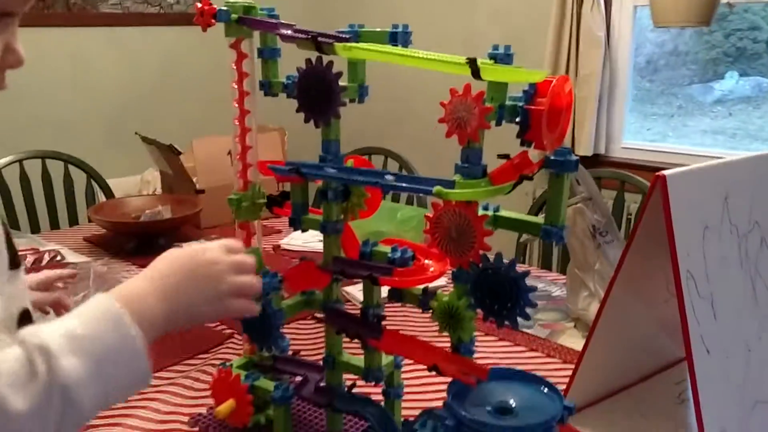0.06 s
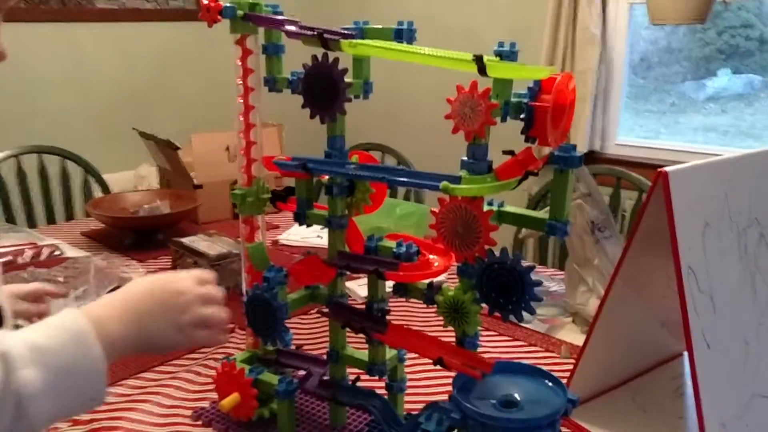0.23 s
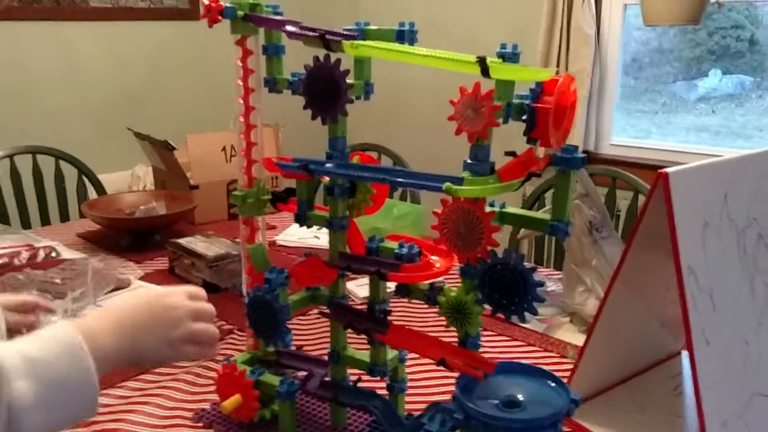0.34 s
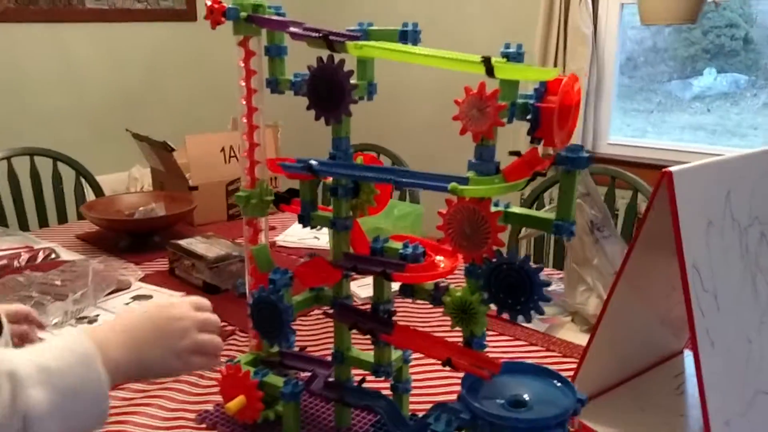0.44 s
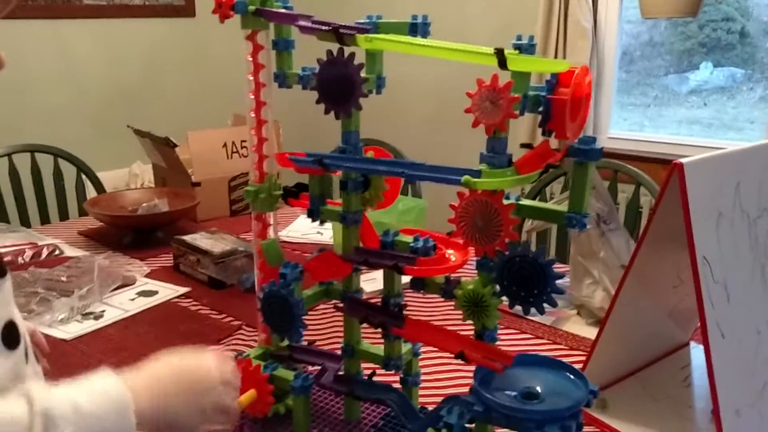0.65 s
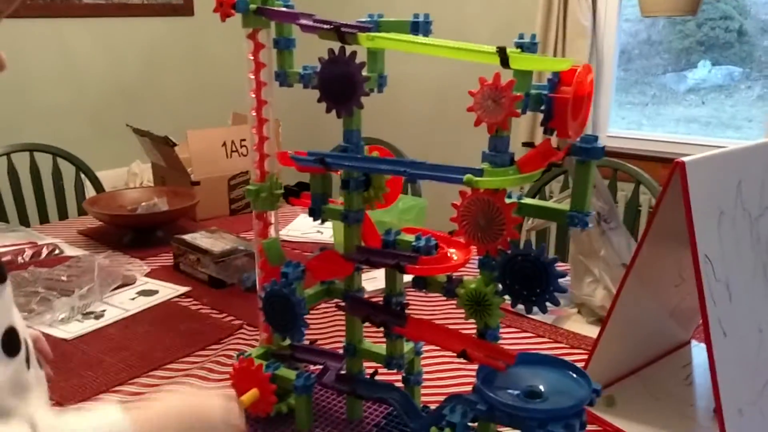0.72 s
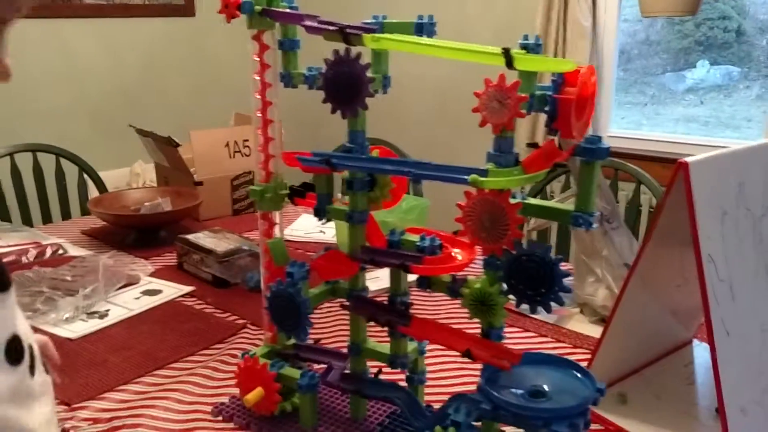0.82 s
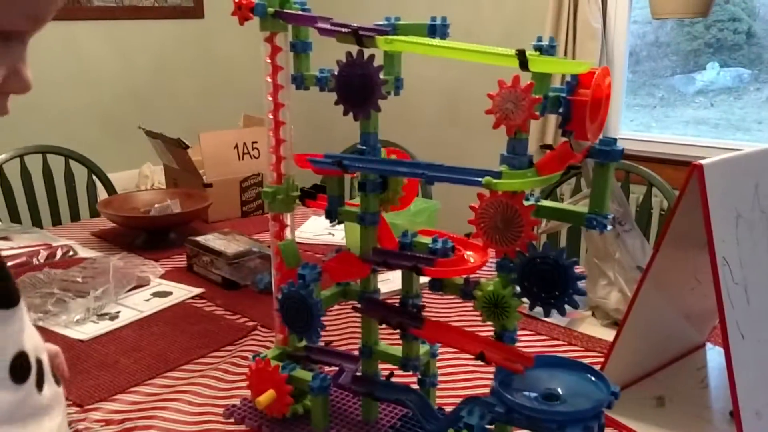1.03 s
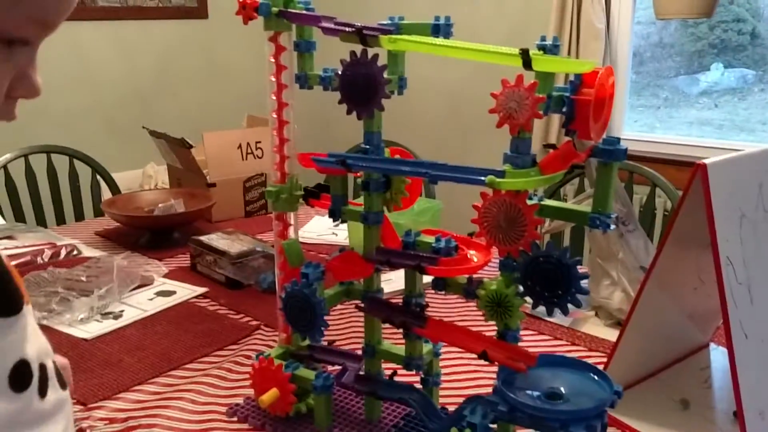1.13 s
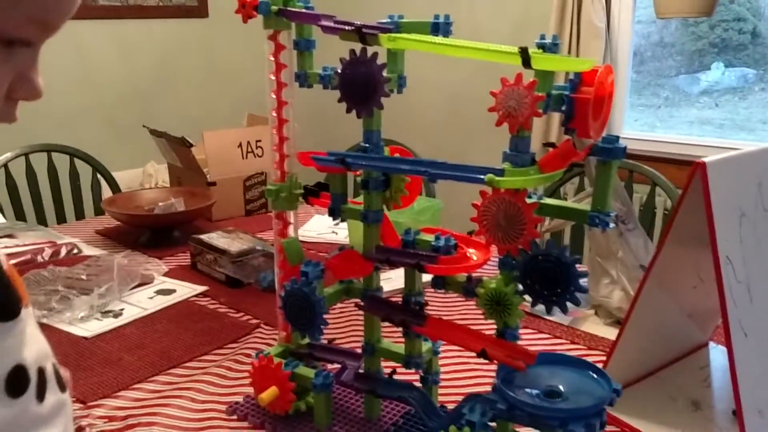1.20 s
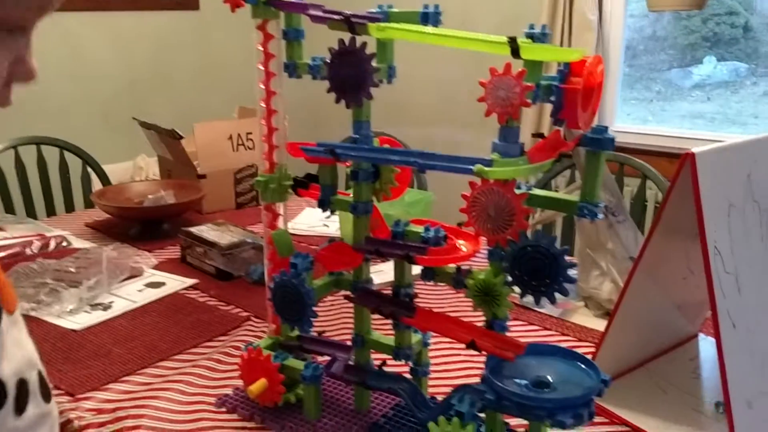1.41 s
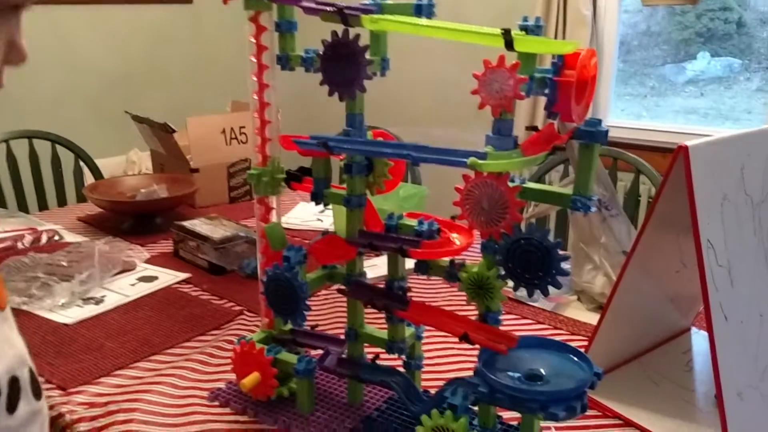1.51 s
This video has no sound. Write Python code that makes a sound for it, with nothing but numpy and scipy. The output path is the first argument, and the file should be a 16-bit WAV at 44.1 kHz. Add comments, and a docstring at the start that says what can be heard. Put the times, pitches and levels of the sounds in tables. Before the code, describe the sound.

Marbles knock, tap and click through a plastic toy track in a quiet room.

```python
"""Marbles work their way down a plastic marble run in a quiet dining room, heard from close by.
They rattle along, thud twice on the frame, tap on a track, click on levers and clack into chutes.
One pings on a thin part and skids, and one rolls on with a low hum. Each hit is a short push
that sets the plastic ringing, and the room answers with a brief echo."""
import sys
import numpy as np
from scipy import signal
from scipy.fft import rfft, irfft
from scipy.io import wavfile

SR = 44100
rng = np.random.default_rng(int(sys.argv[2]) if len(sys.argv) > 2 else 0)


def to_wav(s):
    """Save 16-bit WAV."""
    ch = np.atleast_2d(s).T  # columns
    pcm = np.round(np.clip(ch, -1, 1) * 32767)  # PCM
    wavfile.write(sys.argv[1], SR, pcm.astype(np.int16))


N = 68355
TIME_S = np.arange(N) / SR


def amp(db):
    """Turns decibels into a number to multiply by."""
    return 10 ** (np.asarray(db) / 20)


def unit(x):
    """Scales a sound to an energy of one."""
    return x / np.sqrt(np.sum(x ** 2) + 1e-20)


def read(points, hz):
    """Reads between the rows of a table, with pitch spaced in octaves."""
    pitch_hz, value = np.transpose(points)
    return np.interp(np.log(hz + 1), np.log(pitch_hz + 1), value)


def add(mix, start_s, sound):
    """Mixes a sound in at its start time."""
    part = mix[round(start_s * SR):][:len(sound)]
    part += sound[:len(part)]


def coloured(x, colour):
    """Gives a sound a colour (its balance of low and high) and an average power of one."""
    gains = amp(read(colour, np.fft.rfftfreq(N, 1 / SR)))
    return unit(irfft(rfft(x) * gains, N)) * np.sqrt(N)


def pulse(spectrum_db, size=2048):
    """The shortest push with this spectrum, its energy packed at the start."""
    cepstrum = irfft(np.log(amp(spectrum_db)))
    cepstrum[1:size] *= 2
    cepstrum[size:] = 0
    return irfft(np.exp(rfft(cepstrum)))[:size]


def tone(hz, fade_s, size=16384):
    """One ringing tone. Here and below, fade_s is the time to die away by 60 dB."""
    t = np.arange(size) / SR
    return unit(np.sin(2 * np.pi * hz * t) * amp(-60 * t / fade_s))


def dense_ring(fade_s, evenness=0.24, size=4096):
    """Many crowded tones that die quickly and blur into noise."""
    fade = amp(-60 * np.arange(size) / SR / fade_s)
    spectrum = rfft(rng.standard_normal(size) * np.sqrt(fade))
    evened = spectrum / (abs(spectrum) + 1e-12) ** evenness
    return unit(irfft(evened) * np.sqrt(fade))


def fuzzy_tone(hz, width_hz):
    """Noise gathered around a pitch that may move, with an average power of one."""
    shape = 1 / (1 + (2 * np.fft.fftfreq(N, 1 / SR) / width_hz) ** 2)
    flutter = np.fft.ifft(shape * np.exp(2j * np.pi * rng.random(N)))
    phase = 2 * np.pi * np.cumsum(hz * np.ones(N)) / SR
    return unit((flutter * np.exp(1j * phase)).real) * np.sqrt(N)


# the room's echo: pitch_hz, fade_s, level_db
ROOM_ECHO = [(200, 0.36, 4.5), (545, 0.37, 2.5), (1330, 0.29, 2), (3730, 0.29, 1), (6960, 0.28, 1.5),
             (13100, 0.25, -0.5)]
def room(size=26000, gap_s=0.0022, build_s=0.0042, wall_s=0.0147, spread_s=0.0028):
    """Crowded echoes build up after a short gap, and the high ones die sooner."""
    t, table = np.arange(size) / SR, np.array(ROOM_ECHO)
    echoes = rng.standard_normal(size) * (rng.random(size) < 5000 / SR)
    hz, age_s, spectrum = signal.stft(echoes, SR, nperseg=256)
    fade_s = read(table[:, [0, 1]], hz)[:, None]
    level_db = read(table[:, [0, 2]], hz)[:, None]
    tail = signal.istft(spectrum * amp(level_db - 60 * age_s / fade_s), SR, nperseg=256)[1][:size]
    walls = amp(4 * np.exp(-((t - wall_s) / spread_s) ** 2))  # the nearest walls answer together
    return unit(tail * walls * np.clip((t - gap_s) / build_s, 0, 1))


def hits(events, colour, tones, dense_fade_s, tones_db, spot_db, spot_fade_s, room_db, low_cut_hz,
         tilt_from_hz=350, swell_s=0):
    """Each hit is a sharp push, a dense ring and a few clear tones, followed by the room's echo."""
    out = np.zeros(N)
    hz = np.fft.rfftfreq(4096, 1 / SR)
    peak_hz = max(colour, key=lambda point: point[1])[0]
    low_cut = signal.butter(4, low_cut_hz, "high", fs=SR, output="sos")

    def hit(start_s, level_db, brightness, spot_hz, dense_share=0.98):
        """One knock on a spot that favours its own pitch."""
        tilt_db = lambda f: brightness * np.log2(np.maximum(f, tilt_from_hz) / peak_hz)
        boost_db = 4.5 * np.exp(-(np.log2((hz + 1) / spot_hz) / 0.061) ** 2)
        push = unit(pulse(read(colour, hz) + boost_db + tilt_db(hz)))
        shell = np.sqrt(dense_share) * dense_ring(dense_fade_s)
        shell[0] += np.sqrt(1 - dense_share)  # the rest of the push passes straight through
        sound = amp(spot_db) * tone(spot_hz, spot_fade_s)
        for pitch_hz, tone_db, fade_s in tones:  # each rings a little differently from hit to hit
            gain = amp(tones_db + tone_db + 0.81 * tilt_db(pitch_hz) - 0.05 * rng.standard_normal())
            sign = rng.choice([-1, 1])
            sound += sign * gain * tone(pitch_hz * (1 + 0.0058 * rng.standard_normal()), fade_s)
        add(sound, 0, unit(signal.fftconvolve(push, shell)))
        if swell_s:  # small parts take a moment to start ringing
            swell = 1 - np.exp(-TIME_S[:len(sound)] / swell_s)
            sound = np.linalg.norm(sound) * unit(sound * swell)
        sound = signal.sosfilt(low_cut, sound)
        add(out, start_s, amp(level_db) * sound)
        add(out, start_s, amp(level_db + room_db) * signal.fftconvolve(sound, room()))

    for row in events:
        hit(*row)
    return out


# colour of the room's background: pitch_hz, level_db
HUSH_COLOUR = [(25, -2.5), (130, 1.5), (300, 2.5), (600, -11.5), (1200, -1), (2200, -5.5), (4500, -22),
               (8000, -29), (16000, -33)]
def hush(level_db=-55.5):
    """The quiet room makes a faint, steady noise."""
    return amp(level_db) * coloured(rng.standard_normal(N), HUSH_COLOUR)


# how loud the rattle is: time_s, level_db
RATTLE_LEVELS = [(0, -51), (.13, -56.5), (.15, -49), (.2, -54.5), (.42, -51), (.7, -45), (.95, -44.5),
                 (1.1, -60), (1.4, -83), (1.46, -56), (1.55, -76)]
# colour of the rattle: pitch_hz, level_db
RATTLE_COLOUR = [(60, -26), (200, -16), (700, -5.5), (1200, -2), (2100, -4), (3200, -8), (6000, -18),
                 (9000, -33), (16000, -37)]
def rattle(bumps_per_s=1600, spread_db=3, treble_hz=4000):
    """Rolling marbles make a stream of tiny bumps on the tracks, brighter when they are harder."""
    sizes = amp(spread_db * np.minimum(rng.exponential(1, N), 4)) * rng.standard_normal(N)
    bumps = coloured(sizes * (rng.random(N) < bumps_per_s / SR), RATTLE_COLOUR)
    bumps = (bumps + signal.fftconvolve(bumps, room())[:N]) / np.sqrt(2)
    dull = signal.filtfilt(*signal.butter(2, treble_hz, fs=SR), bumps)
    force = amp(np.interp(TIME_S, *np.transpose(RATTLE_LEVELS)))
    treble = (bumps - dull) * (force / force.max()) ** 0.8
    return force * (dull + treble)


# knocks on the frame: start_s, level_db, brightness_db_per_octave, pitch_hz, dense_share
THUDS = [(.2458, 14.5, 2, 674, 0.14), (0.58, 6.5, -17.5, 330, 0.62)]
# colour of a thud: pitch_hz, level_db
THUD_COLOUR = [(30, -28), (150, -38), (300, 3.5), (700, 12.5), (1100, 10.5), (1800, -1.5), (2700, -17.5),
               (5400, -26), (7000, -64.5), (16000, -87)]
# tones the frame rings with: pitch_hz, level_db, fade_s
FRAME_TONES = [(213.8, -11, 0.11), (305.4, -10, 0.047), (356, -9, 0.071), (429, -9.5, 0.05),
               (543, -10, 0.053)]
def thuds():
    """The frame is knocked twice and rings low and hollow."""
    return hits(THUDS, THUD_COLOUR, FRAME_TONES, dense_fade_s=0.029, tones_db=-11,
                spot_db=-35, spot_fade_s=0.026, room_db=-8.5, low_cut_hz=180, tilt_from_hz=695)


# colour of the overload crack: pitch_hz, level_db
CRACK_COLOUR = [(1000, 1), (5700, -1), (8500, -21.5), (16000, -24)]
def overload_crack(below_thud_db=21):
    """A short, dry crack of overload at the start of the loud first thud."""
    out = np.zeros(N)
    start_s, thud_db, *_ = THUDS[0]
    crack = unit(pulse(read(CRACK_COLOUR, np.fft.rfftfreq(4096, 1 / SR))))
    add(out, start_s, amp(thud_db - below_thud_db) * crack)
    return out


# taps on the track: start_s, level_db, brightness_db_per_octave, pitch_hz
TAPS = [(.3384, -19.5, 5.5, 5210), (.3855, -10.5, 1, 2690), (.4394, -16.5, 3, 2910),
        (.4710, -11.5, 2.5, 1828), (.5438, -13, 3, 2950), (.5745, -7.5, 0.5, 2893), (.6880, -15.5, 2, 2730),
        (.7906, -17.5, 6, 6870)]
# colour of a tap: pitch_hz, level_db
TAP_COLOUR = [(900, 10.5), (1800, 11), (2900, 6.5), (4500, -2.5), (7000, -9.5), (8600, -16), (10000, -11.5),
              (16000, -29)]
# tones the track rings with: pitch_hz, level_db, fade_s
TRACK_TONES = [(1868, -3, 0.067), (2353, -7, 0.045), (2730, -9.5, 0.035), (2935, -8, 0.045),
               (3920, -12, 0.031), (5200, -15, 0.023), (7020, -15.5, 0.0077)]
def taps():
    """A marble taps along a track, setting it ringing lightly."""
    return hits(TAPS, TAP_COLOUR, TRACK_TONES, dense_fade_s=0.033, tones_db=-2.5,
                spot_db=-3, spot_fade_s=0.056, room_db=-3.5, low_cut_hz=684)


# hits on the levers: start_s, level_db, brightness_db_per_octave, pitch_hz
CLICKS = [(.6567, -9.5, -0.5, 3890), (.7200, -11.5, 0, 2806), (.7280, -11, -8.5, 4260),
          (.7655, -22, 0.5, 4430)]
# colour of a click or a ping: pitch_hz, level_db
CLICK_COLOUR = [(1300, -7), (2300, 1.5), (3200, -7), (4000, -5), (6000, -5.5), (7800, -6.5), (8800, -12.5),
                (16000, -18.5)]
# tones a lever rings with: pitch_hz, level_db, fade_s
LEVER_TONES = [(3910, -8, 0.017), (4350, -4, 0.018), (4740, -4, 0.011), (5760, -3, 0.013),
               (6340, -6.5, 0.013), (7520, -11, 0.0099)]
def clicks():
    """Marbles strike stiff little levers, which ring high and stop quickly."""
    return hits(CLICKS, CLICK_COLOUR, LEVER_TONES, dense_fade_s=0.026, tones_db=1.5,
                spot_db=0.5, spot_fade_s=0.028, room_db=-4, low_cut_hz=900, swell_s=0.00085)


# drops into chutes: start_s, level_db, brightness_db_per_octave, pitch_hz, dense_share
CLACKS = [(.7490, 0, -7, 1110, 0.91), (.7512, 1, -4.5, 396, 0.35), (.8446, 0.5, 7.5, 2475, 0.88),
          (.9075, -7.5, 6, 2550, 0.99), (.9500, -13, 4.5, 2860, 0.45), (1.1514, -3.5, 7.5, 2060, 0.71),
          (1.1746, 4, 2.5, 1646, 0.18), (1.5080, -13, -2, 3330, 0.6), (1.5470, -12, -2.5, 1390, 0.7)]
# colour of a clack: pitch_hz, level_db
CLACK_COLOUR = [(60, -59), (350, -10), (1000, 0.5), (1350, -4.5), (1750, 9), (2800, -2.5), (4000, -9),
                (5100, -15.5), (7500, -24.5), (8600, -30), (16000, -45.5)]
# tones a chute rings with: pitch_hz, level_db, fade_s
CHUTE_TONES = [(372, -15, 0.16), (1125, -11, 0.034), (1620, -1.5, 0.03), (1817, -10, 0.22),
               (2900, -13, 0.061), (5010, -16, 0.012), (7500, -24.5, 0.0076)]
def clacks():
    """Marbles drop into chutes, which ring as they land."""
    return hits(CLACKS, CLACK_COLOUR, CHUTE_TONES, dense_fade_s=0.039, tones_db=-5,
                spot_db=-9, spot_fade_s=0.028, room_db=-3.5, low_cut_hz=245)


# hits on a thin part: start_s, level_db, brightness_db_per_octave, pitch_hz
PINGS = [(.9760, -19, -4.5, 4030), (.9974, -8, -2, 5080), (1.0675, -16.5, -1, 3420),
         (1.1196, -27.5, 2, 3700)]
# tones the thin part rings with: pitch_hz, level_db, fade_s
THIN_PART_TONES = [(2574, -6, 0.049), (3400, -11, 0.039), (4430, -9, 0.025), (5040, -16, 0.025),
                   (5860, -11, 0.03), (7060, -8.5, 0.022), (7920, -8, 0.02)]
def pings():
    """Marbles lightly strike a thin part, which rings longer than the levers."""
    return hits(PINGS, CLICK_COLOUR, THIN_PART_TONES, dense_fade_s=0.039, tones_db=-1.5,
                spot_db=-0.5, spot_fade_s=0.011, room_db=-4, low_cut_hz=900, swell_s=0.00065)


def skid(start_s=1.068, level_db=-42.5, fade_s=0.55, pitch_hz=3640, rise_hz_per_s=3200):
    """A marble skids after its ping and keeps the thin part singing: a fuzzy ring that rises and fades."""
    age_s = np.maximum(TIME_S - start_s, 0)
    fade = (age_s > 0) * amp(level_db - 60 * age_s / fade_s)
    return fade * fuzzy_tone(pitch_hz + rise_hz_per_s * age_s, width_hz=380)


# hum of a rolling marble, too faint to notice until late: time_s, level_db, pitch_hz
ROLL_HUM = [(0, -77, 344), (1.149, -61, 369.5), (1.279, -53.5, 364.5), (1.379, -56, 312),
            (1.55, -51.5, 336.5)]
# tones of the plastic shell under it: pitch_hz, width_hz, level_db
SHELL_TONES = [(400, 67, -3), (481, 220, -4)]
def roll():
    """A rolling marble hums, dipping in pitch as it slows, and stirs the shell's low tones."""
    time_s, level_db, pitch_hz = np.transpose(ROLL_HUM)
    hum = fuzzy_tone(np.interp(TIME_S, time_s, pitch_hz), width_hz=43)
    shell = sum(amp(db) * fuzzy_tone(hz, width_hz) for hz, width_hz, db in SHELL_TONES)
    return amp(np.interp(TIME_S, time_s, level_db)) * (hum + shell)


def scene():
    """Adds the hits, the quiet room and the moving marbles into one channel."""
    knocks = thuds() + overload_crack() + clacks() + taps() + clicks() + pings()
    return (knocks + hush() + skid() + rattle() + roll())[None]


def record(dry, ceiling=1.0, top_hz=15750):
    """Flattens any peak above the ceiling, then removes the very highest treble."""
    clipped = np.clip(dry, -ceiling, ceiling)
    high_cut = signal.firwin(255, top_hz, window=("kaiser", 9), fs=SR)
    return signal.oaconvolve(clipped, high_cut[None], "same")


dry = scene()
out = record(dry)
to_wav(out)
```